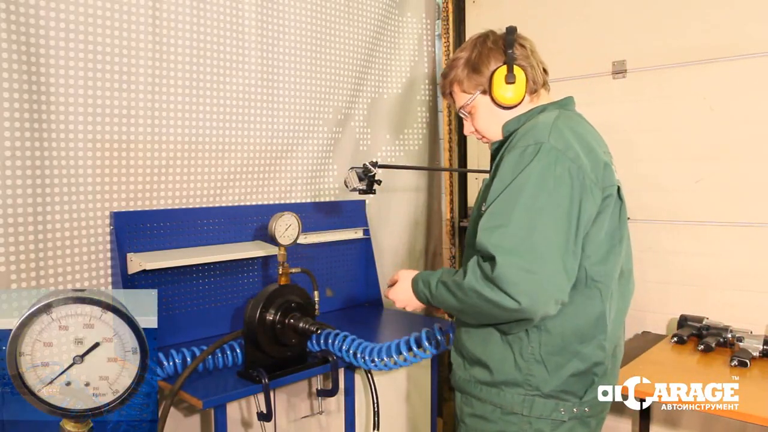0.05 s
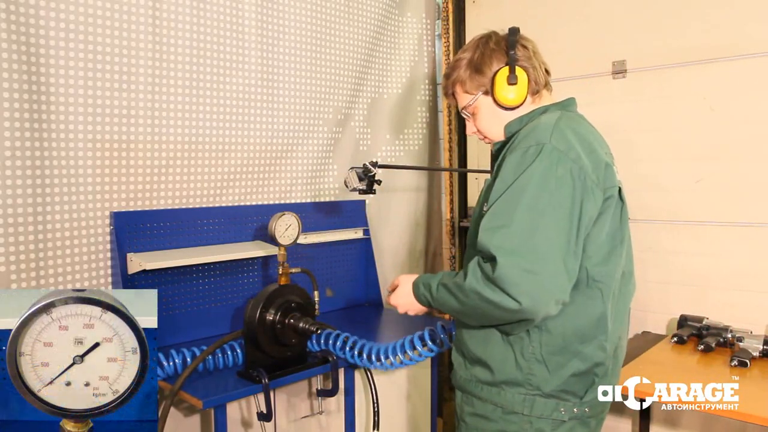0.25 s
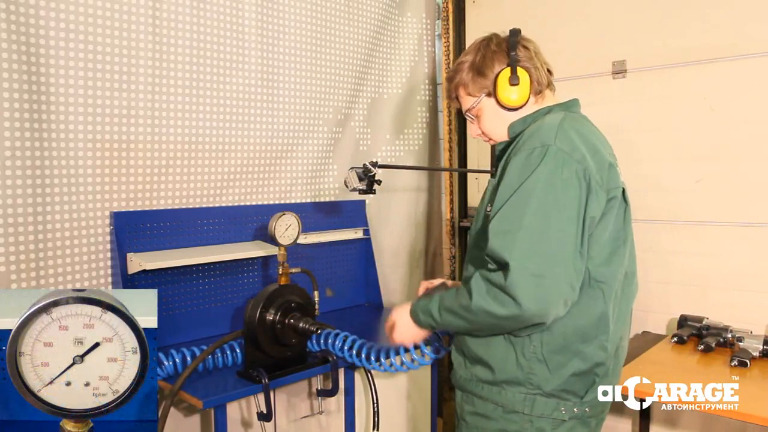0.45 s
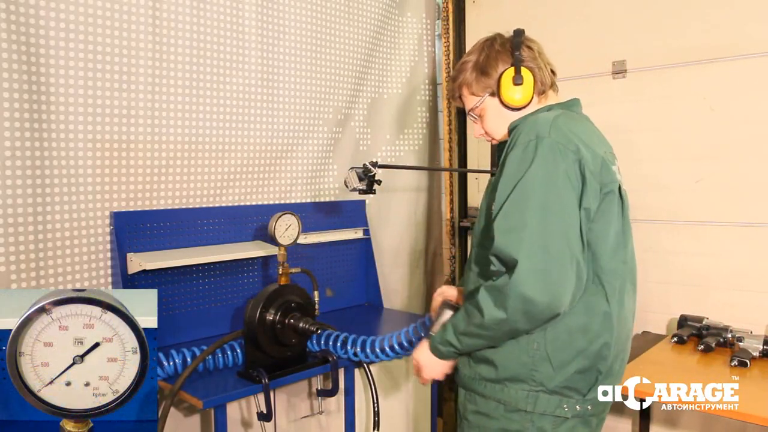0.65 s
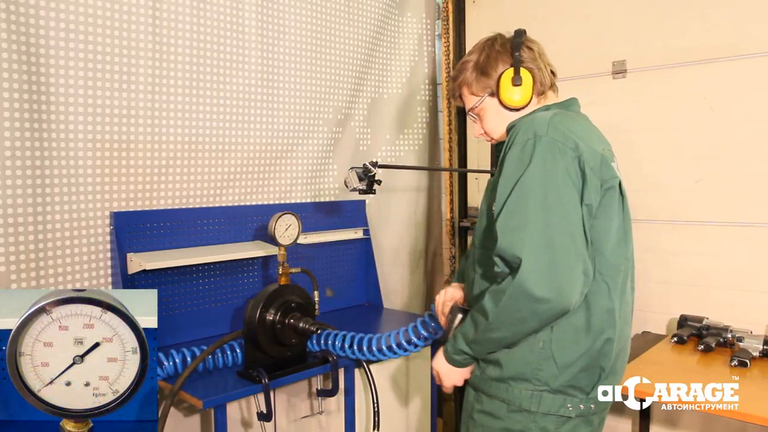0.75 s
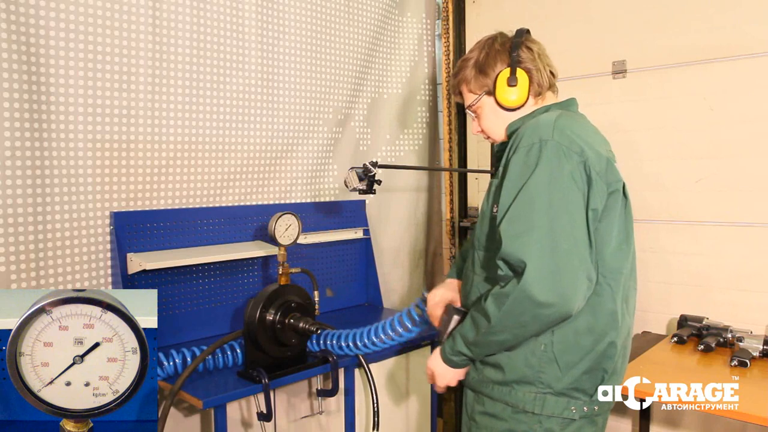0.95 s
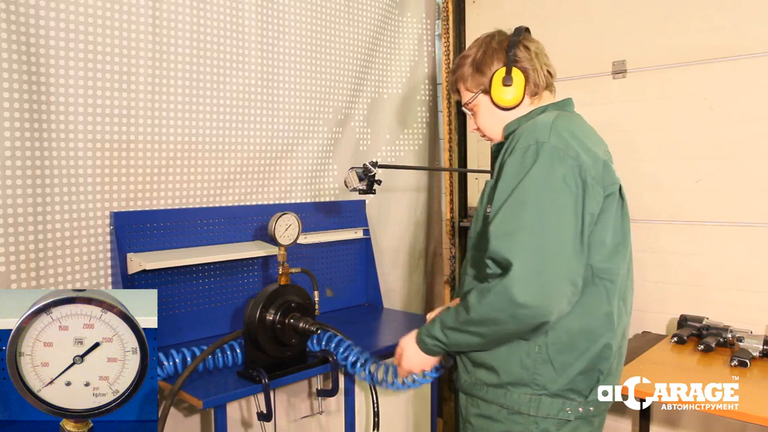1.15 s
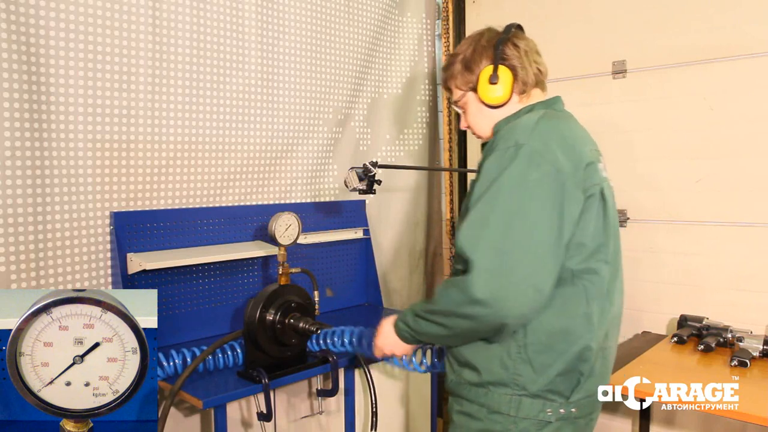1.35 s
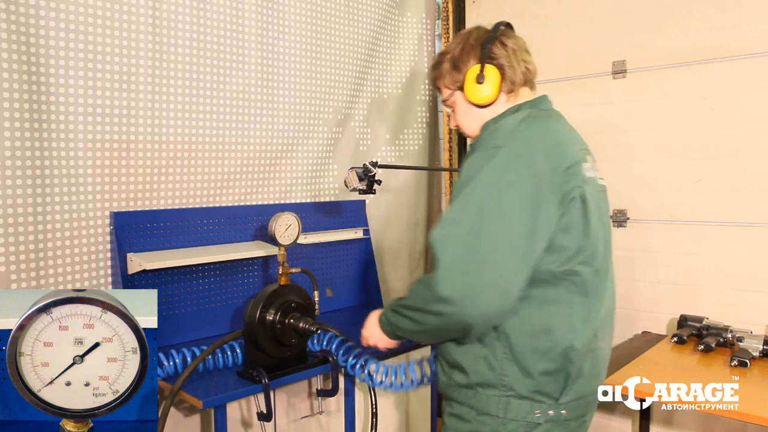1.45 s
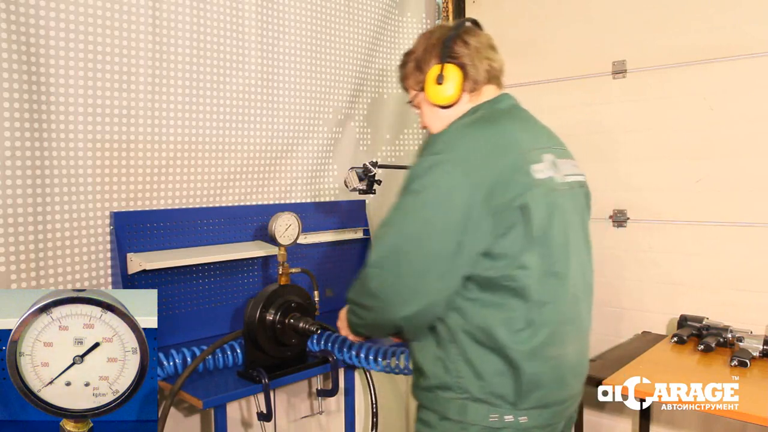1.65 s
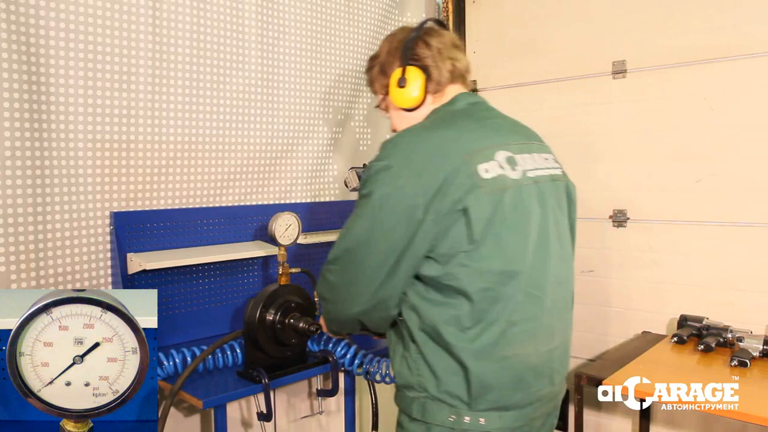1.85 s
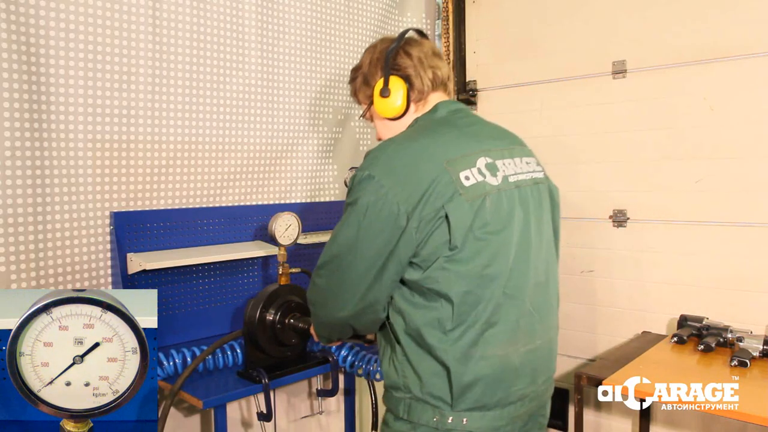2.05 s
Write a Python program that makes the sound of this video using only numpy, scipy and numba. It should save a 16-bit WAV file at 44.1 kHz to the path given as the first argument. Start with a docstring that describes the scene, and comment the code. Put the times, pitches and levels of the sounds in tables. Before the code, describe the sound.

An air impact wrench is blipped twice, loud and close, in a reverberant workshop. At 0.2 seconds it spits air, knocks and spins up, then its hollow rattling whir falls away by 0.8. A switch snaps sharply at 0.9. The second burst comes at 1.3 seconds and winds down by 1.9. Hose and sleeves rustle faintly around 2 seconds, over low background noise.

```python
"""An air impact wrench is blipped twice, with no load, in a hard-walled workshop.
Each pull of the trigger spits air, knocks the hammer and spins up the vane motor. The vanes strike the
housing and chop the air, so a hollow rattle and a hum fall in rate as the rotor coasts down.
A switch snaps between the pulls; hose and sleeves rustle. The room reverberates over a low background
noise, and the single microphone is close to overload."""
import sys
import numpy as np
from scipy import signal
from scipy.fft import rfft, irfft
from scipy.io import wavfile
from scipy.ndimage import uniform_filter1d
from numba import njit

SR = 44100
rng = np.random.default_rng(int(sys.argv[2]) if len(sys.argv) > 2 else 0)


def put_to_file(sound):
    """Save the sound as 16-bit audio at rate SR, in the file named by the first command-line argument."""
    columns = np.atleast_2d(sound).T  # one column per channel
    safe = np.clip(columns, -1, 1)
    whole_steps = np.round(safe * 32767)
    wavfile.write(sys.argv[1], SR, whole_steps.astype(np.int16))


N = 92610
T = np.arange(N) / SR

# trigger pulls: valve_open_s, valve_close_s, exhaust_level_db
PULLS = [(0.21, 0.314, -8), (1.283, 1.408, -9.5)]
# frequency response of the housing: frequency_hz, gain_db
HOUSING = [(60, -27), (140, -4.5), (220, -3), (400, -2.5), (600, 4), (820, -3), (980, -2), (1350, 3.5),
           (1620, -4.5), (2050, -15.5), (2400, -18.5), (2660, -10), (3050, -21), (5000, -24), (15000, -34)]


def vane_motor():
    """Periodic excitation: the rate of passing vanes paces the rattle, the scrape and the hum."""
    # run-up and coast of the rotor, one list per pull: time_s, vane_rate_hz, level_db
    rotor_runs = [
        [(.21, 69.3, -44), (.25, 298.3, -26), (.285, 379.6, -22.5), (.345, 420, -8), (.40, 285.2, -7.5),
         (.455, 211.1, -13), (.55, 139.5, -14), (.665, 87.43, -17.5), (.75, 35.07, -30)],
        [(1.312, 200.6, -12), (1.35, 358.4, -23), (1.405, 455.7, -10), (1.455, 366.2, -8.5), (1.50, 264.5, -11),
         (1.59, 176.9, -12.5), (1.735, 102, -14), (1.79, 74.7, -25), (1.87, 35.4, -30.5)],
    ]
    # vanes rubbing the cylinder, as the tool is held in each pull: frequency_hz, gain_db
    scrape_spectra = [
        [(900, -27), (2250, -14), (2650, 1), (3100, 0), (3800, 2), (5400, -5), (6700, -1), (8400, -18),
         (10300, -3), (11400, -8), (12500, -22), (16000, -33)],
        [(900, -41), (2350, 0), (2660, 11.5), (2950, -10), (3800, 4), (4300, -6), (4800, 5.5), (5700, -8),
         (6750, 5.5), (8000, -11), (9300, -1), (10500, -11), (16000, -28)],
    ]
    out = 0
    for run, scrape_spectrum, (_, close_s, _) in zip(rotor_runs, scrape_spectra, PULLS):
        times, rates, levels = np.array(run, float).T
        vane_hz = np.interp(T, times, rates)
        running = np.clip((T - times[0]) / 0.014, 0, 1) * np.clip((times[-1] - T) / 0.02 + 1, 0, 1)
        turning = running > 0
        passes = np.cumsum(vane_hz * turning) / SR
        gain = undb(np.interp(T, times, levels)) * running
        # friction peaks as each vane arrives, then relaxes
        contact = unit(np.exp(-(passes % 1)) * turning) * np.sqrt(np.mean(turning))
        rattle = vane_rattle(passes, vane_hz, contact, gain)
        scrape = undb(-16) * colour(gain * contact * noise(), scrape_spectrum)
        out += rattle + scrape + exhaust_hum(passes, vane_hz, running, close_s)
    return out


def vane_rattle(passes, vane_hz, contact, gain, jitter_cycles=0.045, scatter_db=2, uneven_db=2):
    """Forced vibration: each vane slaps and chatters, and the housing's resonances colour the sound."""
    late, size = rng.standard_normal((256, 2)).T
    count = np.arange(1, int(passes[-1]))
    arrivals = np.searchsorted(passes, count + jitter_cycles * late[count]).clip(0, N - 1)
    lopsided = np.cos(2 * np.pi * count / 6)  # the pattern repeats every six vanes
    slap_db = scatter_db * size[count] + uneven_db * lopsided - 4
    slaps = np.zeros(N)
    slaps[arrivals] = undb(slap_db) * np.sqrt(SR / vane_hz[arrivals])  # equal power at any rate
    housing_ring = unit(noise() * fade(t60=0.026)) / np.sqrt(N)
    ringing_slaps = 0.71 * slaps + convolve(slaps, housing_ring)
    chatter = undb(-5.5) * contact * noise()
    rattle = colour(gain * (ringing_slaps + chatter), HOUSING)
    return high_pass(high_pass(rattle, vane_hz), vane_hz)  # little sound below the vane rate


def exhaust_hum(passes, vane_hz, running, close_s):
    """Siren principle: air chopped by the vanes sounds three harmonics of the vane rate."""
    # frequency response of the exhaust port: frequency_hz, gain_db
    port_response = [(40, -47), (90, -11.5), (140, -3.5), (200, 0), (280, -4.5), (390, -0.5), (560, -3),
                     (800, 0.5), (1400, -4.5), (3000, -28.5)]
    ragged = passes + 0.055 * flutter(seconds=0.004)  # turbulence makes the puffs early or late
    puffs = sum(undb(db) * np.cos(2 * np.pi * n * ragged) for n, db in [(1, 0), (2, -1.5), (3, -6)])
    # the hum swells as the pressure peaks, near the closing of the valve
    pressure = np.exp(-((T - close_s - 0.0017) / 0.083) ** 2)
    level_db = -29.5 + 4.5 * pressure + 4 * flutter(seconds=0.0095)
    speed_gain = (vane_hz / 416) ** 1.15
    return colour(running * undb(level_db) * speed_gain * puffs, port_response)


def exhaust_air(opening_s=0.0093, closing_s=0.02):
    """Turbulent jet noise: air spits as the valve cracks open, then hisses while the trigger is held."""
    # spectrum of the steady jet: frequency_hz, gain_db
    hiss_spectrum = [(60, -42), (170, -27), (250, -10.5), (400, 6.5), (580, -0.5), (820, 4), (1200, -6),
                     (1900, -4.5), (2550, 2.5), (3400, 1.5), (5500, -4), (8000, -2.5), (11500, -6),
                     (15500, -18)]
    # spits of air as the chambers fill: peak_s, level_db, rise_s, decay_s
    spits = [(0.197, -17, 0.0021, 0.014), (0.203, -5.5, 0.00076, 0.0052), (0.2125, 0, 0.0017, 0.0066),
             (1.295, -7, 0.0037, 0.0084), (1.3107, -2.5, 0.00062, 0.004), (1.317, -2.5, 0.0018, 0.011)]
    # spectrum of a spit: frequency_hz, gain_db
    spit_spectrum = [(100, -23.5), (250, -4), (1400, -3), (4000, -2.5), (5600, -2), (7300, -2),
                     (11000, -4.5), (15500, -14)]
    flow = 0
    for open_s, close_s, db in PULLS:
        opening = np.clip((T - open_s) / opening_s, 0, 1)
        closing = np.exp(-np.maximum(T - close_s, 0) / closing_s)
        flow += undb(db) * opening * closing
    bursts = sum(undb(db) * swell(peak, rise, decay) for peak, db, rise, decay in spits)
    return colour(flow * noise(), hiss_spectrum) + colour(bursts * noise(), spit_spectrum)


def valve_whistles(rise_s=0.0029):
    """Flow-excited tones: the valve whistles for an instant while its gap is narrow."""
    # whistles of the opening valve: peak_s, pitch_hz, level_db, decay_s
    whistles = [(.213, 7730, -2, 0.0061), (1.294, 4145, -2.5, 0.0057), (1.298, 6880, -4, 0.005)]
    return sum(undb(db) * swell(peak, rise_s, decay) * np.sin(2 * np.pi * hz * T)
               for peak, hz, db, decay in whistles)


def hammer_knocks(thump_decay_s=0.0019, low_cut_hz=140.0):
    """Inelastic impact: the hammer catches the anvil with a dull blow and a damped thump of the body."""
    # hammer blows: start_s, level_db, decay_s, thump_level_db, thump_pitch_hz
    knocks = [(0.2079, 0, 0.0041, 6, 287), (.237, -10, 0.0044, -22, 220), (1.2881, -7.5, 0.01, -18, 262),
              (1.3102, -2, 0.0064, -2, 422)]
    # spectrum of a blow: frequency_hz, gain_db
    blow_spectrum = [(40, -18), (120, -17.5), (210, 1), (500, 1), (900, -23.5), (1600, -14), (3500, -6.5),
                     (6000, -21.5), (15000, -35)]
    envelope = sum(undb(db) * strike(start, decay) for start, db, decay, _, _ in knocks)
    blows = colour(noise() * envelope, blow_spectrum)
    thumps = sum(undb(db) * strike(start, thump_decay_s) * np.sin(2 * np.pi * hz * (T - start))
                 for start, _, _, db, hz in knocks)
    return blows + high_pass(thumps, np.full(N, low_cut_hz))


def hammer_clacks(low_cut_hz=328.0):
    """Impulse response: the housing sounds once for each tap of the loose, coasting hammer."""
    # hard contacts: time_s, impulse_level_db
    clacks = [(0.4296, 14.5), (0.4314, 5), (0.4552, 13.5), (0.5429, 12.5), (1.4515, 6), (1.4588, 11),
              (1.5250, 15.5)]
    impulses = np.zeros(N)
    for time_s, db in clacks:
        impulses[int(time_s * SR)] = undb(db)
    return high_pass(colour(impulses, HOUSING), np.full(N, low_cut_hz))


def switch_clicks():
    """Modal ringing: short cracks excite the damped modes of the tool's metal body."""
    # switch snaps and small taps of the connector: start_s, level_db, decay_s, tilt_db_per_octave
    clicks = [(0.738, -23.5, 0.0099, -2), (0.883, -7.5, 0.0035, 2.5), (0.8851, -16, 0.0017, -2.5),
              (0.8886, 5, 0.00096, 2.3), (2.005, -33, 0.0051, 2), (2.011, -30, 0.0036, -3),
              (2.018, -30, 0.0068, 2)]
    # spectrum of a crack before its tilt: frequency_hz, gain_db
    crack_spectrum = [(100, -27), (400, -11), (780, 4.5), (1100, 6), (1350, -7), (1750, 6), (2550, 2.5),
                      (3100, -1.5), (3800, -2.5), (5000, 1.5), (6200, 2), (7600, -5), (8700, 1.5),
                      (11500, -11), (13500, -13), (16000, -25)]
    # modes of the metal body: frequency_hz, relative_level_db, t60_s
    metal_modes = [(794, -29, 0.028), (1820, -23, 0.019), (2480, -20, 0.019), (5114, -35, 0.012),
                   (5930, -23, 0.012), (8664, -39, 0.0074)]
    excitation = noise()
    cracks = sum(colour(excitation * undb(db) * strike(start, decay), crack_spectrum, tilt)
                 for start, db, decay, tilt in clicks)
    return cracks + convolve(cracks, undb(-14) * ring(metal_modes))


def run_down_moans():
    """Frequency glide: a soft tone rises at the end of each run-down."""
    # rising tones: start_s, end_s, start_hz, end_hz, level_db
    moans = [(0.63, 0.721, 186.9, 296.5, -29.5), (1.746, 1.87, 200.6, 384, -26)]
    out = 0
    for start, end, start_hz, end_hz, db in moans:
        progress = np.clip((T - start) / (end - start), 0, 1)
        arch = np.sqrt(4 * progress * (1 - progress))
        pitch_hz = start_hz + (end_hz - start_hz) * progress ** 2
        out += undb(db) * arch * np.sin(2 * np.pi * np.cumsum(pitch_hz) / SR)
    return out


def hose_rustles():
    """Friction noise: hose and sleeves rub in grainy swells."""
    # rubbing movements: peak_s, level_db, rise_s, decay_s
    rustles = [(.015, -41.5, 0.097, 0.029), (1.22, -48.5, 0.07, 0.048), (1.93, -38.5, 0.18, 0.062),
               (2.069, -35.5, 0.022, 0.076)]
    # spectrum of the rubbing: frequency_hz, gain_db
    rub_spectrum = [(100, -1), (300, -3), (1400, 5), (2200, 3), (3500, 3), (5200, -5.5), (6000, 0.5),
                    (8000, -12), (10500, -10), (15500, -20)]
    grain_db = 1.6 * unit(uniform_filter1d(noise(), size=90))
    envelope = sum(undb(db) * swell(peak, rise, decay) for peak, db, rise, decay in rustles)
    return colour(noise() * unit(undb(grain_db)) * envelope, rub_spectrum)


def room(direct, tail_db=-6, build_s=0.0047):
    """Reverberation: dense reflections, fading fastest in the treble, and standing waves follow a sound."""
    # reverberation time: frequency_hz, t60_s
    decay_times = [(100, 0.37), (300, 0.95), (800, 0.53), (2300, 0.74), (5500, 0.51), (10000, 0.37),
                   (16000, 0.27)]
    # standing waves between the walls: frequency_hz, relative_level_db, t60_s
    room_modes = [(225.3, 2.5, 0.47), (371, 4, 0.48), (397.7, 2, 0.43), (724, 1, 0.69), (835, 7.5, 0.47),
                  (1030, 2.5, 0.39), (1100, -4, .6), (1199, 5, 0.55), (1277, 1, 0.56), (1350, 1, 0.94)]
    octave = np.log2(np.clip(np.fft.rfftfreq(N, 1 / SR), 125, 16000) / 125)
    spectrum = rfft(noise())
    tail = 0
    for k in range(8):
        octave_band = irfft(spectrum * np.maximum(1 - abs(octave - k), 0), N)
        tail += octave_band * fade(at_freq(125 * 2 ** k, decay_times))
    tail = unit(tail * (1 - np.exp(-T / build_s))) / np.sqrt(N)
    return direct + convolve(direct, undb(tail_db) * tail + undb(-64.5) * ring(room_modes))


def floor_bumps(pitch_hz=65.4, rise_s=0.011):
    """Structure-borne sound: dull thuds come through the floor and fade within a few cycles."""
    # thuds: peak_s, level_db, decay_s
    bumps = [(0.058, -35, 0.029), (1.79, -39, .03)]
    return sum(undb(db) * swell(peak, rise_s, decay) * np.sin(2 * np.pi * pitch_hz * (T - peak))
               for peak, db, decay in bumps)


def faint_tone(start_s=0.97, end_s=1.41, fade_s=0.038, pitch_hz=371.4, level_db=-46):
    """Pure tone: a faint, steady pitch enters between the pulls and lasts through the second."""
    envelope = np.clip(np.minimum(T - start_s, end_s - T) / fade_s, 0, 1)
    return undb(level_db) * envelope * np.sin(2 * np.pi * pitch_hz * T)


def background(level_db=-42.5):
    """Stationary noise: the workshop's steady background is strongest in the bass."""
    # spectrum of the background: frequency_hz, gain_db
    ambient_spectrum = [(25, -11), (48, -8), (66, 1.5), (88, -5), (180, -4), (400, -11), (1400, -13.5),
                        (4000, -26.5), (10000, -33), (16000, -42)]
    return undb(level_db) * colour(noise(), ambient_spectrum)


def undb(db):
    """Decibels to amplitude ratio."""
    return 10 ** (np.asarray(db) / 20)


def unit(x):
    """Normalisation to rms 1."""
    return x / np.sqrt(np.mean(x ** 2))


def noise():
    """Gaussian white noise."""
    return rng.standard_normal(N)


def flutter(seconds):
    """Low-pass noise: a smooth random wobble of rms 1."""
    width = int(seconds * SR)
    return unit(uniform_filter1d(uniform_filter1d(noise(), width), width))


def swell(peak_s, rise_s, decay_s):
    """Exponential growth to a peak and decay after it."""
    return np.exp(-np.maximum(peak_s - T, 0) / rise_s - np.maximum(T - peak_s, 0) / decay_s)


def strike(start_s, decay_s):
    """Instant attack, then exponential decay."""
    return (T >= start_s) * np.exp(-np.maximum(T - start_s, 0) / decay_s)


def fade(t60):
    """Exponential decay by 60 dB in t60 seconds."""
    return np.exp(-np.log(1000) * T / t60)


def ring(modes):
    """Modal superposition: an impulse response made of damped cosines."""
    return sum(undb(db) * fade(t60) * np.cos(2 * np.pi * hz * T) for hz, db, t60 in modes)


def convolve(x, response):
    """Convolution with an impulse response."""
    return signal.fftconvolve(x, response)[:N]


def at_freq(hz, points):
    """Interpolation of (frequency_hz, value) points on a logarithmic frequency axis."""
    frequencies, values = np.array(points, float).T
    return np.interp(np.log(hz + 1), np.log(frequencies + 1e-12), values)


def colour(x, points, tilt=0):
    """Minimum-phase filter shaped by (frequency_hz, gain_db) points; white noise keeps its power."""
    hz = np.fft.rfftfreq(2 * N, 1 / SR)
    magnitude = unit(undb(at_freq(hz, points) + tilt * np.log2(hz + 20)))
    cepstrum = irfft(np.log(magnitude))
    cepstrum[1:N] *= 2  # folding onto positive time makes the filter causal
    cepstrum[N + 1:] = 0
    return irfft(rfft(x, 2 * N) * np.exp(rfft(cepstrum)))[:N]


@njit
def high_pass(x, cutoff_hz):
    """Two-pole state-variable high-pass with a moving cutoff."""
    out, band, low = np.empty(len(x)), 0., 0.
    damping = np.sqrt(2.)
    for i in range(len(x)):
        g = np.tan(np.pi * cutoff_hz[i] / SR)
        v = (band + g * (x[i] - low)) / (1 + g * (g + damping))
        out[i] = x[i] - damping * v - low - g * v
        band, low = 2 * v - band, low + 2 * g * v
    return out


@njit
def follow(x, attack_s, release_s):
    """Envelope follower with separate time constants for rise and fall."""
    out, level = np.empty(len(x)), 0.
    for i in range(len(x)):
        level += (x[i] - level) / (SR * (attack_s if x[i] > level else release_s))
        out[i] = level
    return out


def scene():
    """Superposition: the wrench in its room adds to the background, the same in both channels."""
    tool = vane_motor() + exhaust_air() + valve_whistles() + hammer_knocks() + hammer_clacks()
    tool += switch_clicks() + run_down_moans() + hose_rustles()
    mono = room(tool) + floor_bumps() + faint_tone() + background()
    return np.array([mono, mono])


def record(dry, threshold_db=-25, ratio=1.595, ceiling=1.05, top_hz=15900):
    """Compression, saturation and band limiting: loud passages dip, peaks round off, the top is cut."""
    level = follow(np.abs(dry[0]), attack_s=0.0065, release_s=0.066)
    compressed = dry * np.maximum(level / undb(threshold_db), 1) ** (1 / ratio - 1)
    rounded = ceiling * np.tanh(compressed / ceiling)
    return signal.sosfilt(signal.ellip(10, 0.2, 80, top_hz, fs=SR, output="sos"), rounded)


dry = scene()
out = record(dry)
put_to_file(out)
```